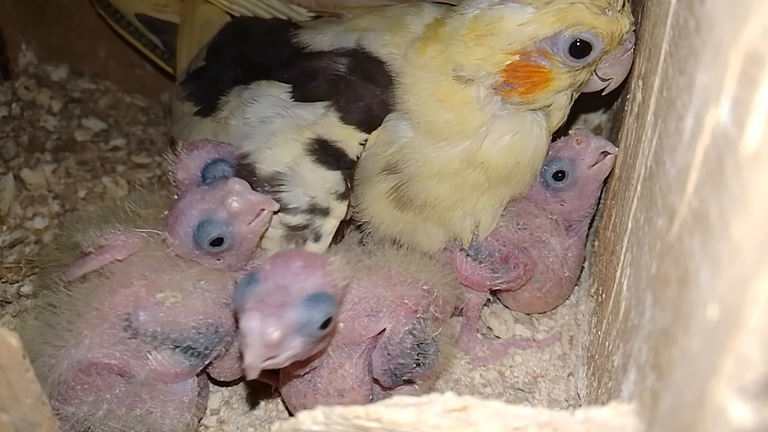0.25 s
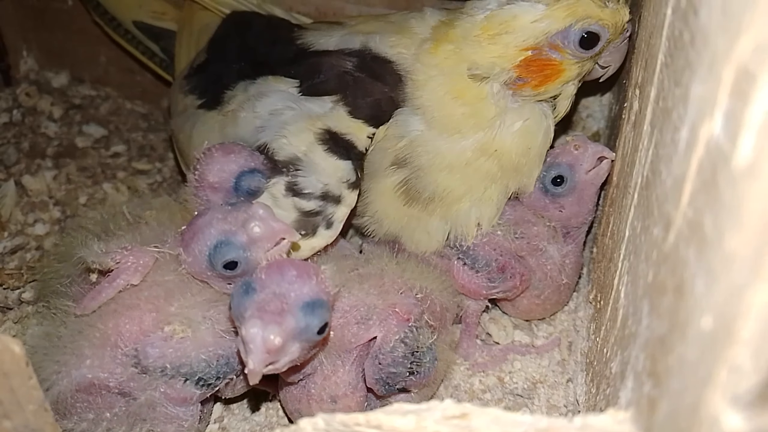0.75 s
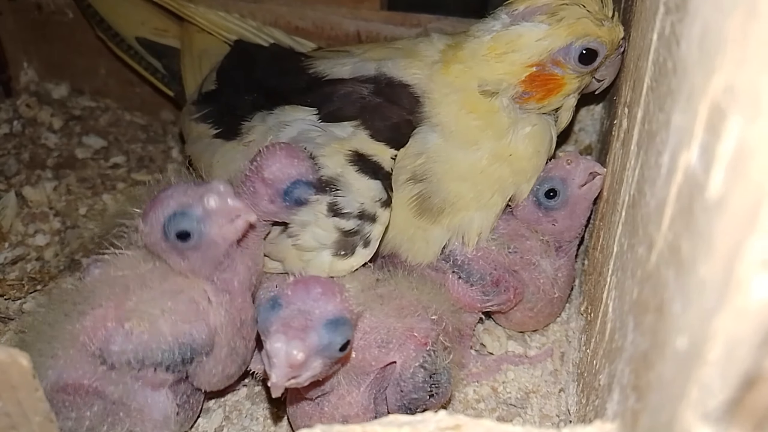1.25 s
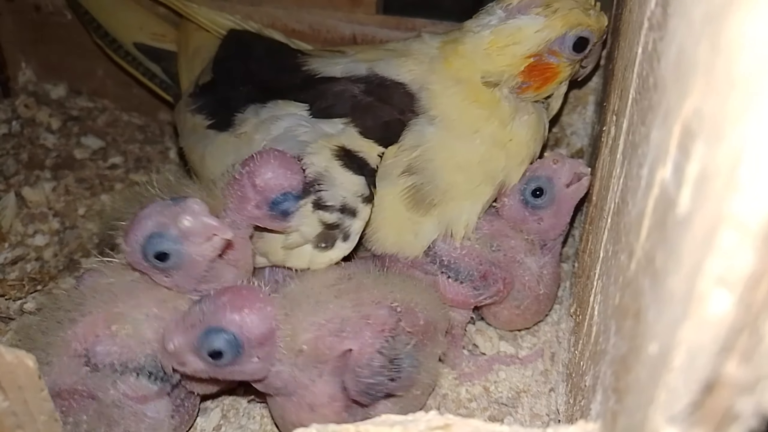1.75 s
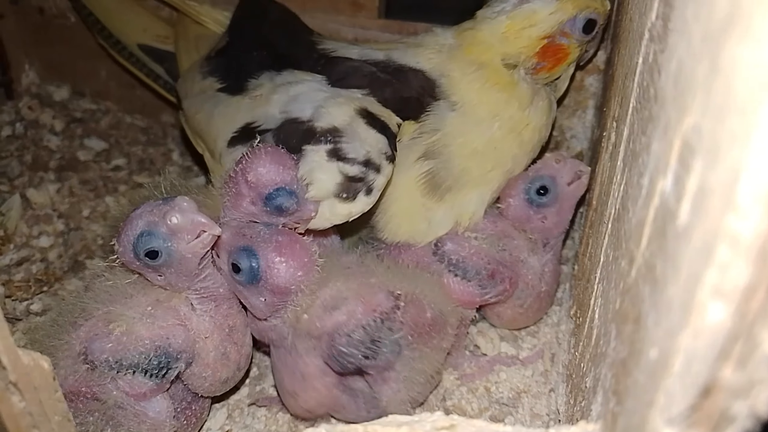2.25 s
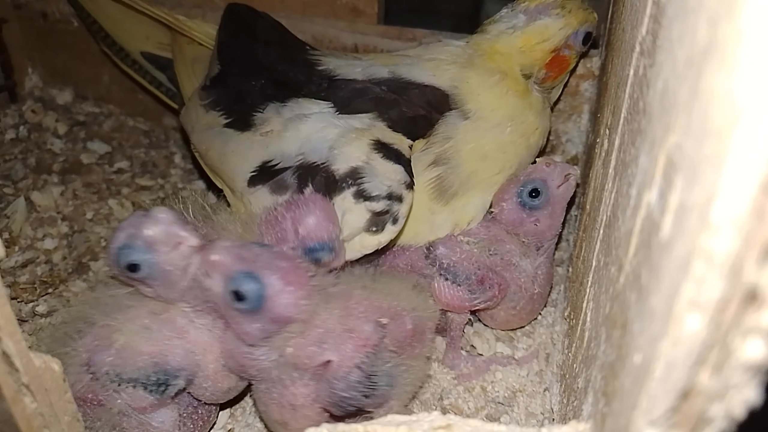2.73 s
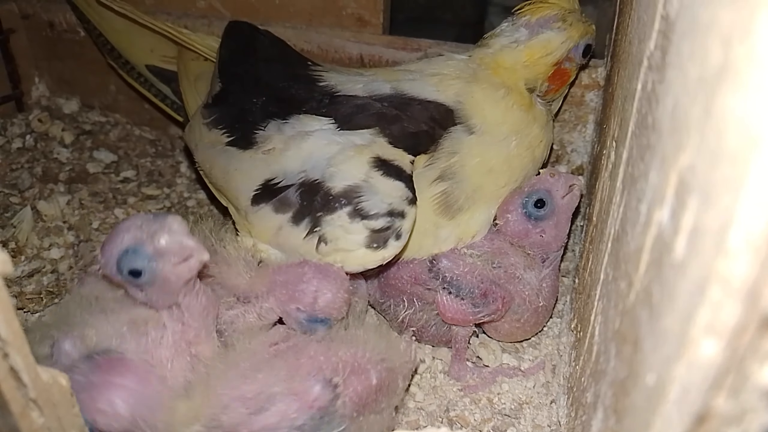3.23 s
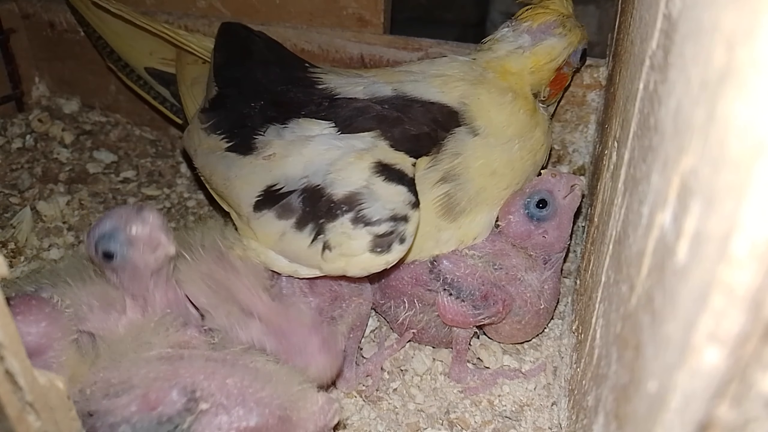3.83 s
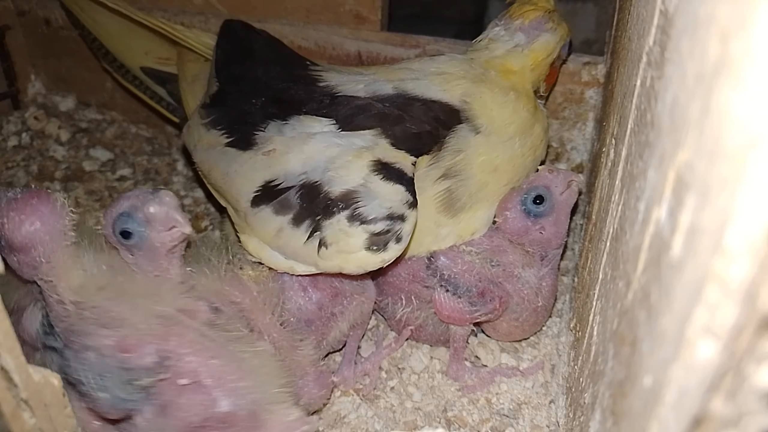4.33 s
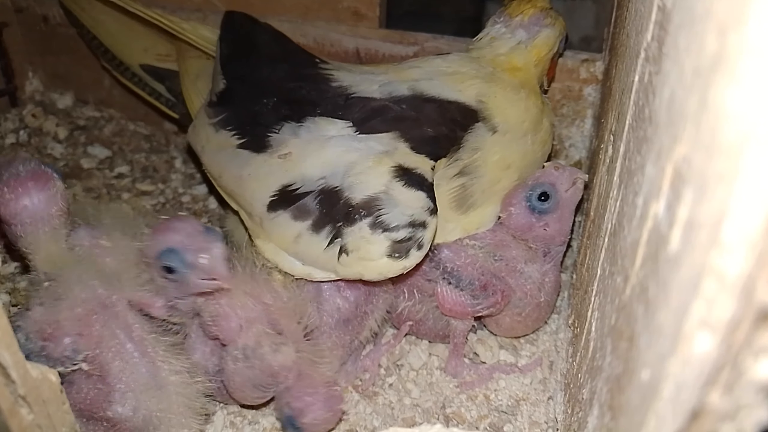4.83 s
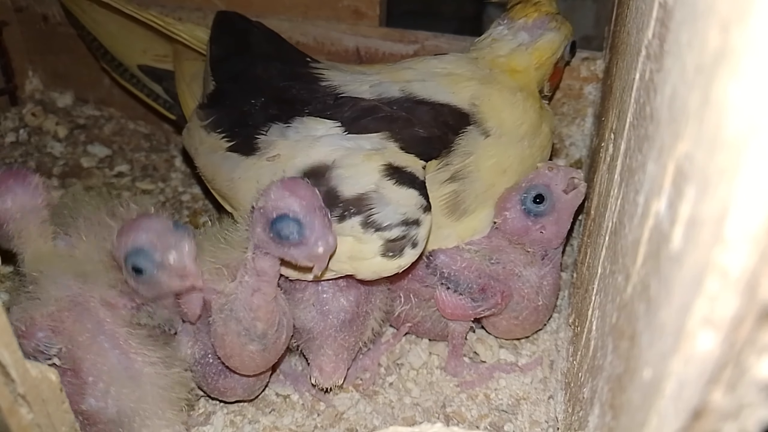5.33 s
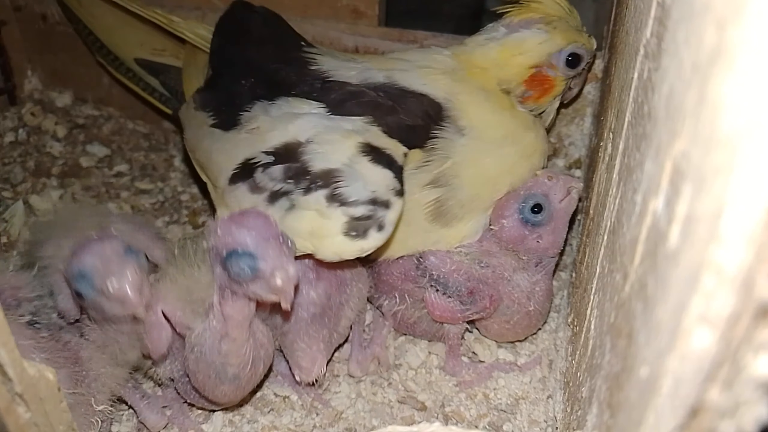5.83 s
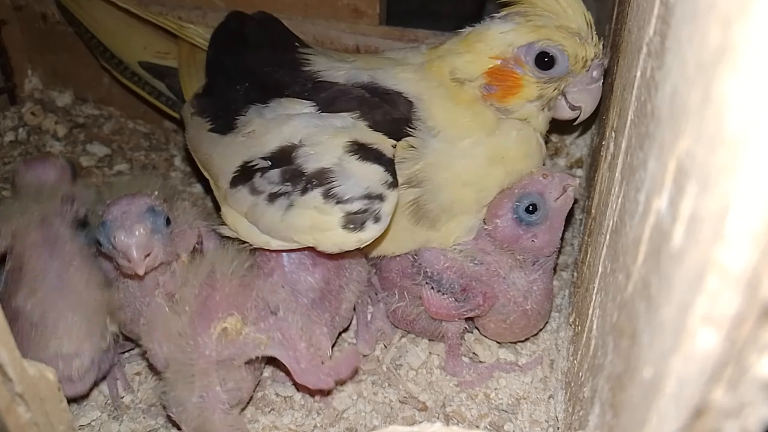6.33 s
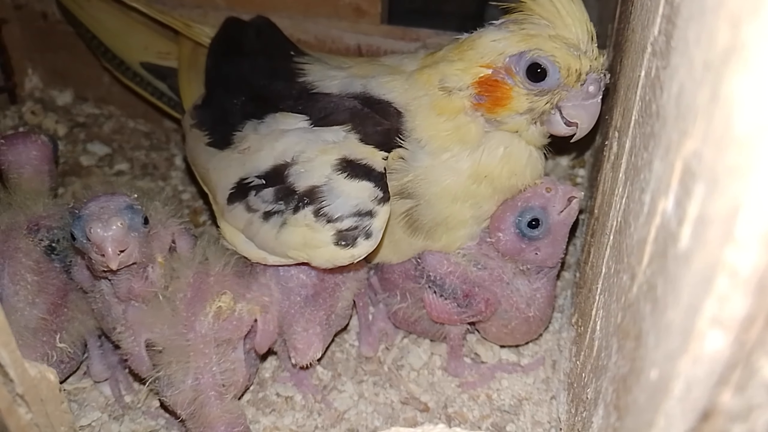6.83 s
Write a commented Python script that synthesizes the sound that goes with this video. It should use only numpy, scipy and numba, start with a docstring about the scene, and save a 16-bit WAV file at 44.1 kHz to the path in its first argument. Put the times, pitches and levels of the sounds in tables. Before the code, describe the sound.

Inside a small wooden nest box, cockatiel chicks beg close to the microphone. A short rasp and falling chirps start at once, followed by a long shaky rising cry. Hoarse rasps, thin peeps, squeals and quick sliding chirps then come in irregular clusters, with the strongest chirp just before six seconds. Beak clicks, soft wooden bumps and rustling bedding sit underneath, over a faint low indoor hum.

```python
"""A short rasp and sliding chirps are heard first, then a long rising cry: cockatiel chicks beg in a nest box.
Rasps are puffs of air ringing a restless throat; chirps, squeals, peeps, murmurs, a whine and the cry
are shaky tones on moving pitches. Beak clicks and bumps on the boards are short ringing tones.
Shaped noise makes the bedding rustle, the shuffling bodies, a faint high chirr and the room's low hum.
The wooden box blurs the voices and clicks and rings on at its own pitches."""
import sys
import numpy as np
from scipy import signal
from scipy.fft import rfft, irfft
from scipy.io import wavfile
from scipy.ndimage import uniform_filter1d
from numba import njit

SR = 44100
rng = np.random.default_rng(int(sys.argv[2]) if len(sys.argv) > 2 else 0)


def generate_wav(signal):
    """Clip the signal to [-1, 1] and save it as 16-bit WAV at the path in sys.argv[1]."""
    frames = np.transpose(np.atleast_2d(signal))
    scaled = np.clip(frames, -1, 1) * 32767
    pcm = np.round(scaled).astype(np.int16)
    wavfile.write(sys.argv[1], SR, pcm)


def decibels_to_gain(level_db):
    """Convert a level in decibels to a linear amplitude gain (20 dB per decade)."""
    exponent = np.asarray(level_db, float) / 20
    return 10 ** exponent


N = 311787  # length [samples]


def unit(x):
    """Scale to rms 1."""
    return x / np.sqrt(np.mean(np.abs(x) ** 2))


def curve(rows, t):
    """Read every column of a table at the times t."""
    s, *columns = np.transpose(rows)
    return [np.interp(t, s, column) for column in columns]


def colour(x, points):
    """Shape a noise by its (frequency, level) points and scale it to rms 1."""
    hz, db = np.transpose(points)
    f = np.maximum(np.fft.rfftfreq(len(x), 1 / SR), 1)
    gain = decibels_to_gain(np.interp(np.log(f), np.log(hz), db))
    return unit(irfft(rfft(x) * gain, len(x)))


def flutter(hz):
    """Random motion up to hz, spread 1."""
    low_pass = signal.butter(2, hz, fs=SR, output="sos")
    return unit(signal.sosfilt(low_pass, rng.standard_normal(N)))


def band(hz, width):
    """Noise in one band, rms 1."""
    edges = [max(hz - width / 2, 5), hz + width / 2]
    band_pass = signal.butter(2, edges, "bandpass", fs=SR, output="sos")
    return unit(signal.sosfilt(band_pass, rng.standard_normal(N)))


def soften(x, hz):
    """Steep loss of treble above hz."""
    return signal.sosfilt(signal.butter(4, hz, fs=SR, output="sos"), x)


def span(start, end, rise, fall):
    """Samples of a call, their times, and an envelope that opens at its start and dies after its end."""
    i = np.arange(int(start * SR), min(int((end + 5 * fall) * SR), N))
    t = i / SR
    opening = np.clip((t - start) / rise, 0, 1)
    return i, t, opening * np.exp(-np.maximum(t - end, 0) / fall)


# bands of the room hum: (frequency [Hz], width [Hz], relative level [dB])
HUM_BANDS = [(30., 12, -15.5), (65.54, 7.7, -1), (91.35, 14, -1), (127.6, 24, -5)]
# loudness of the hum: (time [s], level [dB])
HUM_LEVEL = [(0.0, -48), (0.96, -53.5), (2.75, -48.5), (4.33, -54.5), (6.69, -55), (6.81, -44), (7.07, -45)]


def hum():
    """Low room hum: narrow bands of noise, each wavering on its own."""
    mix = unit(sum(decibels_to_gain(db) * band(hz, width) for hz, width, db in HUM_BANDS))
    level_db, = curve(HUM_LEVEL, np.arange(N) / SR)
    return mix * decibels_to_gain(level_db)


# a faint high chirring: (frequency [Hz], width [Hz], level [dB])
FAR_CHIRR = (5900., 220., -88.)


def far_chirr():
    """One narrow band of noise, its level restless by some 6 dB."""
    hz, width, db = FAR_CHIRR
    return band(hz, width) * decibels_to_gain(db + 6 * flutter(9))


# tone colour of the bedding: (frequency [Hz], relative level per Hz [dB])
RUSTLE_COLOUR = [(100, -18), (170, 0.5), (253, 6), (400, -7.5), (613, -12), (795, -2.5), (1130, -2.5),
                 (1790, -9), (2740, -12), (4140, -13.5), (4890, -31.5), (6060, -40), (7500, -47),
                 (10500, -32.5), (13000, -56.5), (16000, -55.5)]
# loudness of the bedding: (time [s], level [dB])
RUSTLE_LEVEL = [(0.0, -47), (2.75, -59.5), (3.21, -53.5), (4.09, -59.5), (4.59, -52), (6.69, -59.5),
                (7.07, -49.5)]


def rustle():
    """Bedding: grainy noise with uneven loudness, its treble coming and going."""
    grains = rng.standard_normal(N) * decibels_to_gain(1.2 * flutter(130) + 2 * flutter(24))
    level_db, = curve(RUSTLE_LEVEL, np.arange(N) / SR)
    whole = colour(grains, RUSTLE_COLOUR) * decibels_to_gain(level_db)
    # filtering both ways keeps the dull part in step, so the rest is pure treble
    dull = signal.sosfiltfilt(signal.butter(4, 7500, fs=SR, output="sos"), whole)
    return dull + (whole - dull) * decibels_to_gain(-1.5 + 3.2 * flutter(3.7))


# bodies shifting on the boards: (time of the peak [s], level [dB], time to sink 20 dB [s])
# the swell takes 0.47 of that time; a negative time swaps the two: slow swell, quick sinking
SHUFFLES = [(0.0, -60, 1.4), (0.65, -53, -0.32), (1.85, -54.5, 1.56), (2.83, -50, 0.03), (3.42, -61.5, .5),
            (3.89, -61, 0.05), (4.72, -54.5, 0.32), (6.4, -55, .5), (6.88, -54.5, 1.6)]


def shuffles():
    """Dull noise that swells to each shuffle and sinks after it, over a faint steady floor."""
    t = np.arange(N) / SR
    gain = decibels_to_gain(-69.5)
    for s, db, sink in SHUFFLES:
        distance = np.maximum((t - s) / sink, (s - t) / (0.47 * sink))
        gain = gain + decibels_to_gain(db - 20 * distance)
    return band(413, 430) * gain * decibels_to_gain(2.5 * flutter(4.1))


def knocks(events, modes, push):
    """Each blow pushes for `push` seconds and rings the same modes, a little differently."""
    out, t = np.zeros(N + SR), np.arange(SR // 3) / SR
    pushing = np.sin(.5 * np.pi * np.minimum(t / push, 1)) ** 2
    for s, peak_db in events:
        ring = np.zeros(len(t))
        for hz, db, t60 in modes:
            strength = decibels_to_gain(db + 2 * rng.standard_normal())
            ring += strength * np.sin(2 * np.pi * hz * t) * 1000. ** (-t / t60)
        ring *= pushing
        out[int(s * SR):][:len(t)] += decibels_to_gain(peak_db) * ring / np.abs(ring).max()
    return out[:N]


# bodies bumping the boards: (time [s], peak level [dB])
BUMPS = [(0.269, -41), (1.052, -45.5), (1.241, -42.5), (2.172, -48), (2.373, -41.5), (2.674, -48),
         (2.757, -44.5), (2.82, -46), (3.075, -49), (6.177, -34.5), (6.418, -29.5), (6.655, -42.5),
         (6.75, -45), (7.019, -52)]
# ringing of the boards: (frequency [Hz], typical relative level [dB], time to fall 60 dB [s])
BOARD_MODES = [(254.7, 10, 0.17), (290.2, 0.5, 0.38), (760, -16, 0.22)]


def bumps():
    """Soft blows that ring the wooden boards."""
    return knocks(BUMPS, BOARD_MODES, push=0.0058)


# beak clicks, before the box adds its ring: (time [s], peak level [dB])
CLICKS = [(0.591, -26), (0.856, -37), (1.241, -27), (1.91, -42), (2.323, -30), (2.567, -25.5),
          (3.399, -24.5), (3.879, -48), (3.934, -35), (4.354, -42.5), (4.389, -42), (4.565, -28.5),
          (5.264, -26), (5.751, -45.5), (6.609, -27), (6.855, -36)]
# ringing of a click: (frequency [Hz], typical relative level [dB], time to fall 60 dB [s])
CLICK_MODES = [(1006, 4.5, 0.02), (1350., 10, 0.012), (1574, 1, 0.011)]


def clicks():
    """Beak clicks: short pushes whose ringing dies at once."""
    return knocks(CLICKS, CLICK_MODES, push=0.0022)


def note(start, length, first_hz, last_hz, db, swell, first_db, last_db, early):
    """Rows of a note: it swells for a share of its length, fades, and slides (early > 1: mostly at first)."""
    u = np.linspace(0, 1, num=9)
    gain = np.interp(u, [0, np.clip(swell, .05, .95), 1], decibels_to_gain([first_db, 0, last_db]))
    hz = last_hz + (first_hz - last_hz) * (1 - u) ** early
    return np.transpose([start + length * u, hz, db + 20 * np.log10(gain)])


# how the throat colours every voiced call: (frequency [Hz], gain [dB])
VOICE_THROAT = [(900, -2.5), (1700, -4), (2400, 1), (2820, -3), (3500, 0.5), (4200, -0.5), (4700, 0.5),
                (6000, -12), (9000, -16.5)]


def voice(rows, orders, rough, shake, waver, rise, fall):
    """Partials on a wavering pitch track; roughness trades the steady swing for a shaky one."""
    s, track_hz, level_db = np.transpose(rows)
    i, t, env = span(s[0], s[-1], rise, fall)
    hz = np.interp(t, s, track_hz)
    gain = np.interp(t, s, decibels_to_gain(level_db))  # even in amplitude, so a note stays full between its ends
    phase = 2 * np.pi * np.cumsum(hz * (1 + rough * waver[i])) / SR
    swing = np.sqrt(1 - rough) + np.sqrt(rough) * shake[i]
    throat_hz, throat_db = np.transpose(VOICE_THROAT)
    tone = 0
    for k, db in orders:
        throat = np.interp(np.log(k * hz), np.log(throat_hz), throat_db)
        tone = tone + decibels_to_gain(db + throat) * np.exp(1j * k * phase)
    out = np.zeros(N)
    out[i] = np.sqrt(2) * env * gain * (swing * tone).real
    return out


def murmurs(shake, waver):
    """Sixty faint two-partial murmurs at chance moments and pitches."""
    out = np.zeros(N)
    for when, pitch, slide, size in rng.random((60, 4)):
        s, hz, db = when * (N / SR - .1), 800 * 3 ** pitch, -60 + 14 * size
        last_hz = hz * (0.94 + 0.24 * slide)
        rows = [(s, hz, db - 2), (s + .025, hz, db), (s + .06, last_hz, db - 8.5)]
        out += voice(rows, [(1, 0), (2, -2.5)], 0.33, shake, waver, rise=0.0055, fall=0.0057)
    return out


# one low even whine, before the throat: (time [s], pitch [Hz], level [dB])
WHINE = [(5.1, 518, -58.5), (5.24, 533.3, -48.5), (5.33, 519, -78.5)]
# its partials: (multiple of the pitch, relative level [dB])
WHINE_ORDERS = [(2, -14.5), (4, -8), (5, 2.5), (6, -5), (7, -6.5), (8, -4.5), (9, -16)]


def whine(shake, waver):
    """A stack of overtones that hardly shakes."""
    return voice(WHINE, WHINE_ORDERS, 0.065, shake, waver, rise=0.0052, fall=0.0073)


# thin peeps, before the throat: (start [s], length [s], first pitch [Hz], last pitch [Hz], peak level [dB])
PEEPS = [ (1.25, 0.091, 1190, 1180, -46), (2.117, 0.031, 1320, 1156, -44.5),
         (2.192, 0.031, 1330, 1135, -47), (2.907, 0.031, 1390, 1110, -49.5),
         (3.152, 0.061, 1650, 1910, -36.5), (3.935, 0.036, 1275, 1140, -49.5),
         (4.266, 0.05, 1714, 1330, -50), (4.752, 0.033, 1965, 1760, -43), (4.793, 0.045, 1470, 1290, -48),
         (5.882, 0.061, 2190, 2030, -33), ]
# their partials: (multiple of the pitch, relative level [dB])
PEEP_ORDERS = [(1, 2), (2, -44.5), (3, -39.5)]


def peeps(shake, waver):
    """Nearly pure tones that swell almost to their end and slide late."""
    out = np.zeros(N)
    for call in PEEPS:
        rows = note(*call, swell=0.95, first_db=-3, last_db=-14.5, early=0.27)
        out += voice(rows, PEEP_ORDERS, .15, shake, waver, rise=0.0013, fall=0.019)
    return out


# hoarse squeals, before the throat: (start [s], length [s], first pitch [Hz], last pitch [Hz], peak level [dB])
SQUEALS = [ (0.424, 0.028, 1006, 990, -47.5), (0.95, 0.051, 1068, 967, -51.5),
           (2.054, 0.057, 1187, 1098, -48), (3.01, 0.039, 1400, 1430, -43.5),
           (3.049, 0.064, 1213, 1240, -49), (3.118, 0.045, 1330, 1540, -43.5),
           (3.144, 0.064, 1390, 1360, -42.5), (3.262, 0.078, 1248, 1182, -43),
           (3.334, 0.097, 1108, 1085, -47), (3.501, 0.057, 1538, 1325, -42),
           (3.974, 0.05, 1947, 2097, -44.5), (5.413, 0.035, 1064, 1064, -47),
           (5.465, .075, 1085, 1297, -50), (5.585, 0.039, 1320, 1232, -44), (5.626, 0.1, 1170, 1472, -54),
           (5.82, 0.066, 1750, 1687, -29), ]
# their partials: (multiple of the pitch, relative level [dB])
SQUEAL_ORDERS = [(1, 0), (2, -2), (3, -10), (4, -20.5), (5, -20.5)]


def squeals(shake, waver):
    """Slightly shaky tones rich in overtones."""
    out = np.zeros(N)
    for call in SQUEALS:
        rows = note(*call, swell=0.9, first_db=0, last_db=-11.5, early=1.56)
        out += voice(rows, SQUEAL_ORDERS, .18, shake, waver, rise=0.0026, fall=0.0079)
    return out


# sliding chirps, before the throat: (start [s], length [s], first pitch [Hz], last pitch [Hz], peak level [dB])
CHIRPS = [ (0.0, 0.033, 2366, 1834, -37.5), (0.03, 0.045, 1750, 1250, -42), (0.0, 0.057, 3950, 3564, -46),
          (0.806, 0.047, 1940, 2390, -42.5), (0.884, 0.05, 3160, 3350, -37), (1.03, 0.086, 3226, 3630, -31),
          (1.359, 0.027, 2440, 2790, -42), (1.401, 0.019, 4300, 2980, -31.5),
          (1.412, 0.026, 2900, 2800, -29.5), (1.433, 0.048, 2544, 1710, -39.5),
          (1.462, 0.074, 2590, 1660, -38.5), (1.701, 0.035, 3800, 3220, -38.5),
          (1.71, 0.046, 2970, 1940, -35.5), (1.744, .025, 3490, 2880, -30.5),
          (1.757, 0.038, 2880, 2760, -24.5), (1.781, 0.066, 2500, 1830, -35.5),
          (1.876, 0.051, 2510, 2410, -49), (2.021, 0.041, 2623, 3330, -40), (2.145, 0.047, 2726, 3720, -30),
          (2.183, 0.052, 3700, 2450, -37), (2.222, 0.03, 1690, 1930, -34), (2.463, 0.05, 4120, 1920, -35),
          (2.502, 0.09, 3306, 2460, -35.5), (2.777, 0.022, 2550, 2690, -41),
          (3.157, 0.039, 3450, 3710, -41), (3.938, 0.034, 3310, 3480, -41.5),
          (4.181, .035, 4250, 2100, -41.5), (4.213, 0.019, 2230, 3600, -40),
          (4.221, 0.037, 3570, 2350, -39.5), (4.374, .03, 3900, 3400, -40.5),
          (4.399, 0.028, 3670, 2850, -27), (4.424, .05, 2850, 2827, -27), (4.445, .028, 3460, 2876, -26.5),
          (4.479, 0.024, 3510, 3474, -24), (4.494, 0.033, 2990, 2480, -34),
          (4.505, 0.064, 2330, 1680, -36.5), (4.933, .03, 2830, 1950, -47), (6.019, .033, 4900, 3000, -49),
          (5.822, 0.032, 3500, 3434, -18.5), (5.945, 0.034, 2026, 1540, -43),
          (6.062, 0.04, 3500, 4320, -40.5), (6.07, .055, 1730, 2295, -42.5),
          (6.079, 0.083, 2750, 2940, -42.5), (6.132, .035, 3270, 3680, -38.5),
          (6.148, 0.027, 4290, 4180, -38), (6.168, 0.041, 3600, 4156, -30.5),
          (6.175, 0.047, 1906, 2150, -37.5), (6.225, 0.028, 1610, 1520, -40.5),
          (6.236, .022, 3200, 4560, -35), (6.251, 0.049, 4850, 5230, -46),
          (6.255, 0.042, 2750, 2586, -33.5), (6.19, .03, 4500, 5900, -39),
          (6.195, 0.068, 2730, 3140, -37.5), (6.559, 0.053, 3346, 2275, -34),
          (6.598, 0.033, 2640, 2654, -33), (6.62, 0.045, 2380, 2300, -44), (6.811, 0.03, 3860, 2515, -36.5),
          (6.485, .04, 3310, 3220, -39), (6.852, 0.07, 3500, 3534, -31.5),
          (6.902, 0.043, 2480, 2080, -41.5), (6.967, 0.052, 3250, 3440, -30.5),
          (7.021, 0.043, 3700, 3500, -41.5), ]


def chirps(shake, waver):
    """One strongly shaking partial with a trace of its octave, sliding mostly at first."""
    out = np.zeros(N)
    for call in CHIRPS:
        rows = note(*call, swell=0.46, first_db=-6, last_db=-12, early=2)
        out += voice(rows, [(1, 0), (2, -38)], .4, shake, waver, rise=0.0022, fall=0.016)
    return out


# one long rising cry, before the throat: (time [s], pitch [Hz], level [dB])
CRY = [(0.112, 1350, -54), (0.15, 1580, -46.5), (0.2, 1886, -34.5), (0.245, 2045, -38), (0.283, 2020, -53),
       (0.3, 2005, -39.5), (0.344, 2000, -36.5), (0.378, 1953, -67)]
# its partials: (multiple of the pitch, relative level [dB])
CRY_ORDERS = [(1, 3), (2, -4), (3, -20), (4, -31), (5, -24), (6, -35)]


def cry(shake, waver):
    """The shakiest voice, though its pitch wavers gently for its roughness."""
    return voice(CRY, CRY_ORDERS, .6, shake, 0.69 * waver, rise=.002, fall=0.011)


def squeaks():
    """All voiced calls, sharing one pitch waver and two speeds of shaking; only the cry keeps its full treble."""
    wide, narrow = (unit(flutter(hz) + 1j * flutter(hz)) for hz in (200, 150))
    waver = .05 * flutter(35)
    quiet = murmurs(narrow, waver) + whine(narrow, waver) + peeps(narrow, waver)
    calls = quiet + squeals(narrow, waver) + chirps(wide, waver)
    return soften(calls, 5600) + cry(wide, waver)


@njit
def svf(x, hz, width):
    """Band-pass with a moving centre, gain 1 there."""
    y, b, l = np.empty(len(x)), 0., 0.
    for i in range(len(x)):
        g, k = np.tan(np.pi * hz[i] / SR), width / hz[i]
        v = (b + g * (x[i] - l)) / (1 + g * (g + k))
        b, l, y[i] = 2 * v - b, l + 2 * g * v, k * v
    return y


def throat_ring(air, hz, width):
    """Air ringing one moving resonance: two band-passes in a row, rms 1."""
    return unit(svf(svf(air, hz, width), hz, width))


def slapping_air():
    """The membranes slap unevenly, about 260 times a second; each slap lets out a puff of noisy air."""
    gaps, sizes = rng.standard_normal((N // 50, 2)).T
    at = np.cumsum(SR / 260 * np.exp(.45 * gaps)).astype(int)
    slaps = np.zeros(N)
    slaps[at[at < N]] = decibels_to_gain(3.37 * sizes[at < N])
    puffs = signal.lfilter([1], [1, -np.exp(-1 / (0.0052 * SR))], slaps)  # a puff fades in 5.2 ms
    return (0.32 + puffs) * rng.standard_normal(N) + slaps


# hoarse rasps; swells under .002 s and sinking times under .008 s are raised to those values:
# (start [s], swell [s], time to sink 20 dB [s], level of the main part at its peak [dB],
#  shrillness: high ring under the main part [dB])
RASPS = [ (0.0, .003, 0.02, -39, -45), (0.289, 0.058, 0.04, -38, -49), (0.421, .002, 0.03, -37, -38),
         (0.49, 0.065, 0.1, -52, -16.5), (0.652, .01, 0.18, -43, -42), (0.805, 0.025, 0.02, -55, -19),
         (0.852, 0.056, .04, -36, -49), (0.947, 0.0026, 0.29, -41.5, -24), (1.019, 0.06, 0.06, -35, -50),
         (1.098, 0.028, 0.02, -33.5, -48), (1.355, 0.023, 0.24, -40.5, -47),
         (1.528, 0.0077, 0.063, -24.5, -34), (1.558, 0.01, 0.16, -40.5, -14),
         (1.976, .002, .18, -47.5, -40.5), (2.14, 0.0051, 0.09, -38.5, -46.5),
         (2.318, 0.017, 0.06, -28, -7), (2.5, 0.05, 0.16, -53.5, -29), (2.658, 0.02, 0.08, -48.5, -15),
         (2.81, 0.027, 0.08, -47.5, -24), (2.96, 0.0059, 0, -33.5, -30), (2.988, .012, 0.05, -33.5, -30),
         (3.13, 0.078, 0.1, -46, -27), (3.233, 0.0028, 0.1451, -36.5, -49.5),
         (3.496, 0.0018, 0.13, -52, -6), (3.589, 0.0026, 0.2, -62, -8), (3.652, 0.016, 0.03, -30.5, -23),
         (3.762, .005, -0.09, -49, -8.5), (3.811, 0.003, 0.05, -40.5, -26), (3.92, 0.0023, -0.02, -46, -29),
         (3.933, .002, 0.1, -42, -32.5), (4.027, 0.0069, 0.07, -31.5, -8), (4.054, 0.013, 0.05, -41, -39),
         (4.174, 0.0044, .06, -51.5, -40), (4.233, 0.016, 0.1, -49.5, -26), (4.37, 0.13, 0.06, -43, -27.5),
         (4.645, 0.017, 0.11, -45, -28.5), (4.746, 0.0017, .015, -36.5, -29),
         (4.895, 0.0046, 0.09, -42.5, -44), (5.072, 0.0046, -0.01, -36.5, -20),
         (5.24, 0.0089, 0.05, -43, -11), (5.372, 0.07, -0.86, -51, -42), (5.579, .004, .055, -36, -33),
         (5.745, 0.0034, -0.84, -53, -30), (5.783, 0.0014, 0.1254, -35, -17.5),
         (5.822, 0.0023, .14, -38, -32), (6.055, 0.027, 0.2, -44, -27), (6.139, 0.076, 0.06, -38, -28),
         (6.381, 0.0087, 0.1, -43.5, -21), (6.476, 0.0081, 0.07, -44, -7.5),
         (6.582, 0.0088, 0.12, -41.5, -7.5), (6.644, 0.013, 0.0551, -25.5, -19),
         (6.664, 0.04, 0.045, -30.5, -8), (6.806, 0.0085, 0.12, -42.5, -18), (6.847, 0.037, .06, -34.5, -6),
         (6.954, 0.032, .2, -42, -9), ]
# throat centre of the rasps, read when each rasp peaks: (time [s], frequency [Hz])
THROAT_CENTRE = [(0.0, 2320), (0.34, 3280), (0.43, 2610), (1.12, 3280), (1.42, 2590), (1.55, 3660),
                 (2.0, 2750), (2.16, 3740), (2.7, 3620), (2.85, 2640), (3.01, 3820), (3.17, 3060),
                 (3.24, 3430), (3.5, 3550), (3.67, 3930), (4.03, 3900), (4.24, 2900), (4.67, 3620),
                 (4.75, 3140), (4.9, 3470), (5.08, 3460), (5.58, 3270), (5.79, 3470), (6.4, 3330),
                 (6.55, 2940), (6.66, 3670), (6.88, 3670), (7.0, 3300)]
# tone colour of the breath: (frequency [Hz], relative level per Hz [dB])
BREATH_COLOUR = [(6000, -3), (7500, -7), (8500, 1), (10500, 1), (12000, -4), (13500, -30.5), (16000, -41.5)]


def rasps():
    """Puffs of air ring a restless throat, with a wide breathy part, a shrill ring and a hiss of breath."""
    gain, broad, upper, hiss = np.zeros((4, N))
    hz = np.full(N, 3300.)
    for start, swell, sink, db, shrill_db in RASPS:
        swell, sink = max(swell, .002), max(sink, .008)
        i, t, env = span(start, start + swell + 2 * sink, rise=0.0014, fall=0.0027)
        late = t - start - swell
        swelling_db = -12 * np.maximum(-late / swell, 0)
        sinking_db = -20 * np.maximum(late / sink, 0) ** 1.03
        effort = env * decibels_to_gain(db + swelling_db + sinking_db)
        hz[i] = curve(THROAT_CENTRE, start + swell)[0]
        gain[i] += effort
        broad[i] += effort * decibels_to_gain(-10.5 - .5 * (db + 45.5))  # weak rasps are breathier
        upper[i] += effort * decibels_to_gain(shrill_db)
        hiss[i] += effort * decibels_to_gain(-38.5 + 0.46 * (shrill_db + 31))  # shrill rasps hiss more
    air = slapping_air()
    # the throat never holds still: two narrow resonances wander around its centre
    high = throat_ring(air, hz * 1.04 * np.exp(0.068 * flutter(25)), 986.)
    low = throat_ring(air, hz * .8 * np.exp(0.068 * flutter(25)), 986.)
    body = soften(0.8 * high + 0.35 * low, 4050)
    # the throat's running level is evened out, so each rasp keeps its own loudness
    body = body / np.sqrt(uniform_filter1d(body ** 2, size=SR // 30))
    breathy = soften(throat_ring(air, np.full(N, 2700.), 3000.), 4130)
    shrill = soften(throat_ring(air, 5480 * np.exp(0.13 * flutter(21)), 700.), 7000)
    return gain * body + broad * breathy + upper * shrill + hiss * colour(air, BREATH_COLOUR)


# ringing air in the box: (frequency [Hz], width [Hz], relative level [dB])
BOX_MODES = [(1870, 260, 2), (1890, 4.1, -14.5), (2893, 9, -8.5), (3470, 16, -12.5)]


def box(near):
    """The box answers with a short noisy blur and rings on at its own pitches."""
    t = np.arange(SR // 4) / SR
    blur = rng.standard_normal(len(t)) * np.exp(-np.log(1000) * t / 0.057) * (t > .002)  # -60 dB at 57 ms
    blur = blur / np.sqrt(np.sum(blur ** 2))
    modes = np.zeros(len(t))
    for hz, width, db in BOX_MODES:
        modes += decibels_to_gain(db) * np.sin(2 * np.pi * hz * t) * np.exp(-np.pi * width * t) * width / SR
    return signal.oaconvolve(near, decibels_to_gain(-5) * blur + decibels_to_gain(4) * modes)[:N]


def scene():
    """All sources; the box answers the voices and clicks."""
    background = hum() + far_chirr() + rustle() + shuffles()
    near = clicks() + squeaks() + rasps()
    return (background + bumps() + near + box(near))[None]


def roll_off(x):
    """The treble ends steeply here."""
    return signal.sosfilt(signal.butter(12, 15719, fs=SR, output="sos"), x)


def record(dry):
    """The converter adds a small constant offset."""
    mix = dry - .0028
    return roll_off(mix)


dry = scene()
out = record(dry)
generate_wav(out)
```